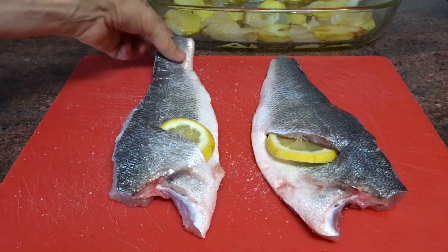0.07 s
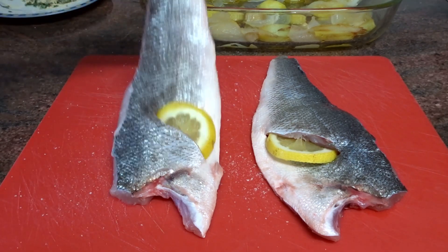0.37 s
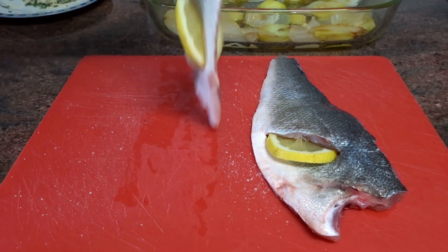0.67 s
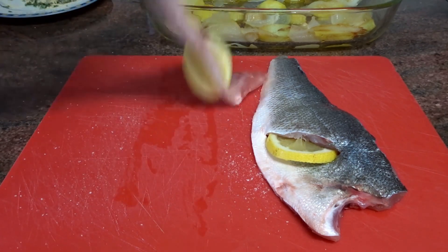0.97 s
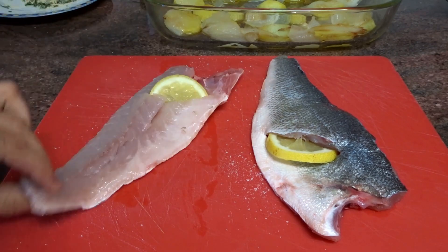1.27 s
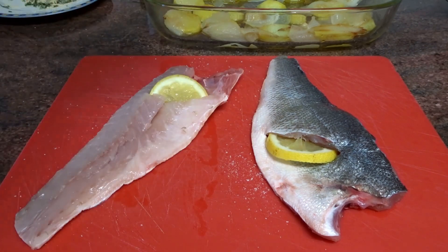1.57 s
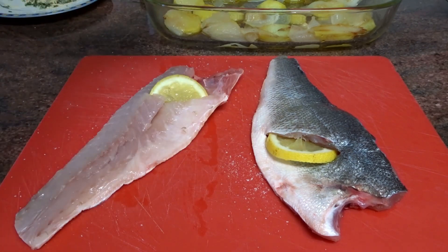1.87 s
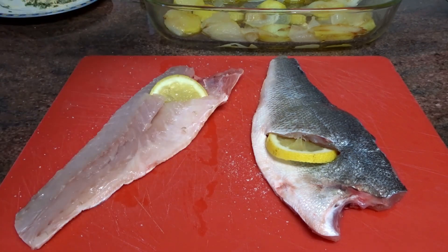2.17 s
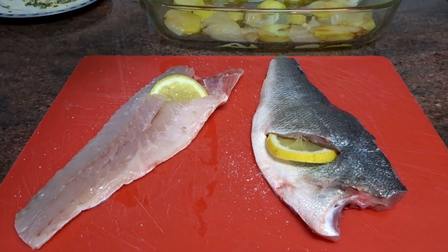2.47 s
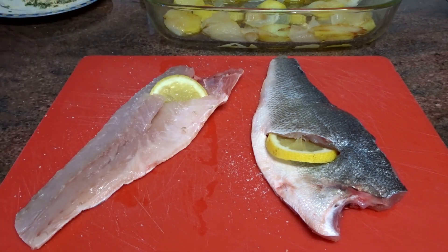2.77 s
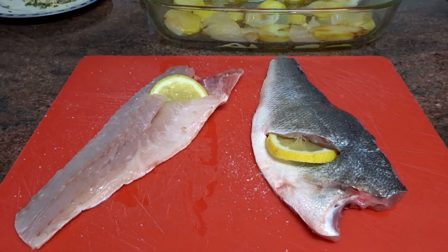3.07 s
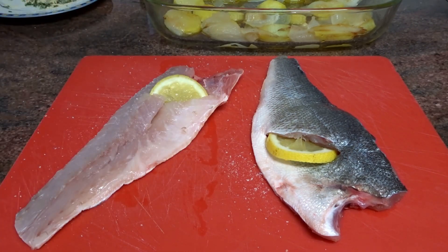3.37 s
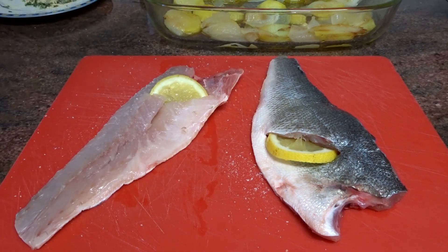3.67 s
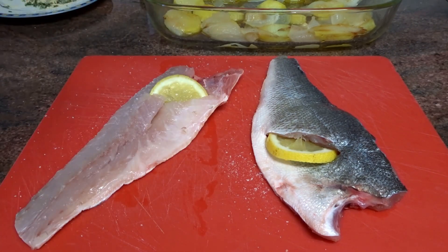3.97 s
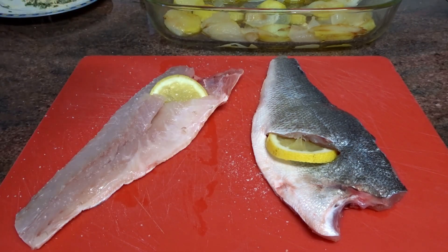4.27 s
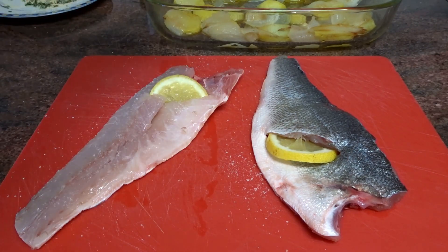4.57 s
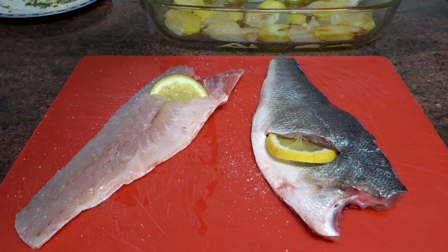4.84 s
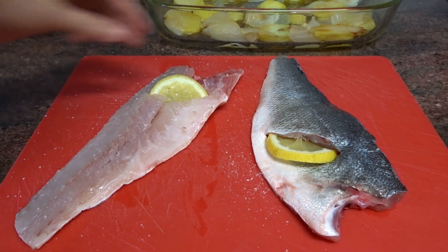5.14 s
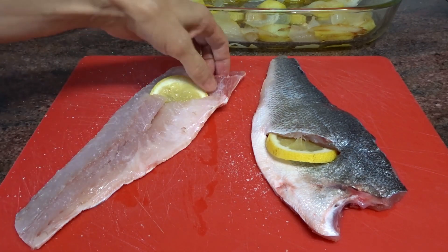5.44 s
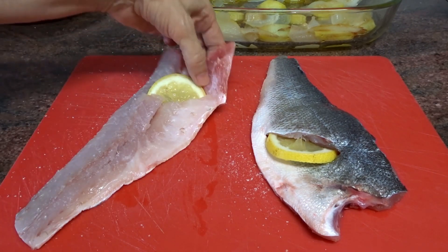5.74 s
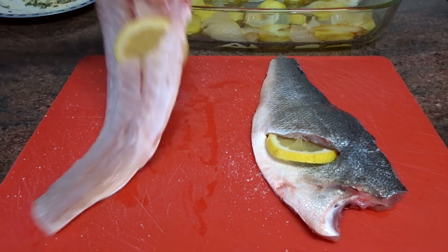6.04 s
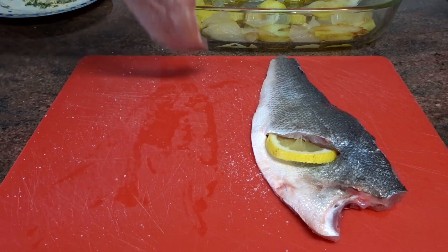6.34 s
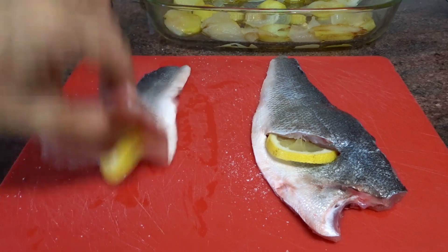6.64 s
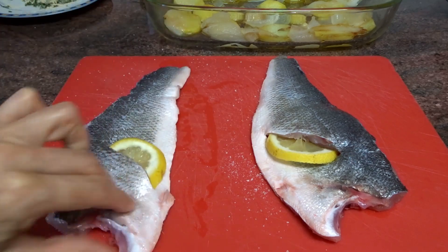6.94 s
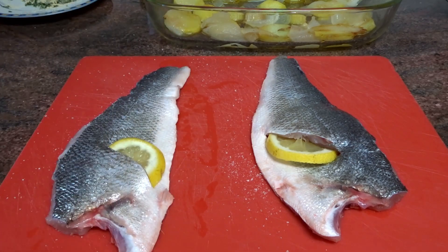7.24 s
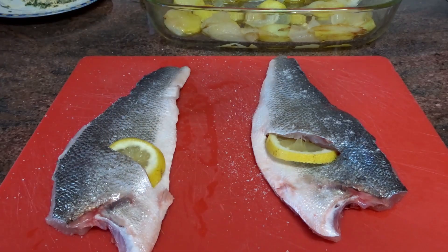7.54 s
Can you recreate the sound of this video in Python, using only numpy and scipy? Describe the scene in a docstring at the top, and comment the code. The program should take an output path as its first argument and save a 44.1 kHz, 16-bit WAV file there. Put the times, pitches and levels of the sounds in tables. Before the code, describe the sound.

Close by in a small kitchen, wet fish skin squelches off a cutting board and the fillet flops down. Salt rattles crisply in a shaker, pauses for about a second, then rattles again. A few damp finger taps and another sticky peel lead to the loudest sound, a wet slap back onto the board. A low hum and a faint rush like far traffic lie underneath.

```python
"""Raw fish fillets on a plastic cutting board in a small kitchen: one is peeled off, flipped and laid down,
salted from a shaker in two even bouts, then gripped, peeled off again and slapped back.
Peeling tears a wet film and rings pockets of air; landing excites the board's damped modes; salt rattles
as many tiny impacts. Behind it lie soft room noise, mains hum and a distant rush like traffic,
with one vehicle whose hum swells and sinks as it passes."""
import sys
import numpy as np
from scipy import signal
from scipy.fft import rfft, irfft, next_fast_len
from scipy.io import wavfile
from scipy.ndimage import map_coordinates

SR = 44100
rng = np.random.default_rng(int(sys.argv[2]) if len(sys.argv) > 2 else 0)


def waveform_to_disk(signal):
    """Save audio, clipped to [-1, 1], as 16-bit WAV at the path in sys.argv[1]."""
    frames = np.transpose(np.atleast_2d(signal))
    scaled = np.clip(frames, -1, 1) * 32767
    samples = np.round(scaled).astype(np.int16)
    wavfile.write(sys.argv[1], SR, samples)


N = 335468
TIME = np.arange(N) / SR


def amp(db):
    """Decibels as an amplitude ratio."""
    return 10 ** (np.asarray(db) / 20)


def unit(x):
    """Normalisation to rms 1."""
    return x / np.sqrt(np.mean(x ** 2) + 1e-20)


def along(points, hz):
    """Interpolation of (Hz, value) points on a logarithmic frequency axis."""
    freqs, values = np.transpose(points)
    return np.interp(np.log(hz + 1), np.log(freqs), values)


def wobble(rate):
    """Random modulation: a smooth curve with rate knots a second."""
    return map_coordinates(rng.standard_normal(int(N * rate / SR) + 4), [TIME * rate])


def filtered(x, response):
    """Linear filtering: the spectrum of x times a frequency response."""
    n = x.shape[-1]
    padded = next_fast_len(n + SR // 10)
    return irfft(rfft(x, padded) * response(np.fft.rfftfreq(padded, 1 / SR)), padded)[..., :n]


def resonance(hz, centre_hz, q):
    """Response of a damped oscillator, with a peak gain of 1."""
    damping = 1j * hz * centre_hz / q
    return damping / (centre_hz ** 2 - hz ** 2 + damping)


def stereo(pair, coherence):
    """Partial coherence: two independent signals mix as mid and side into left and right."""
    angle = lambda hz: np.arccos(np.clip(along(coherence, hz), -1, 1)) / 2
    mid, side = filtered(pair, lambda hz: np.array([np.cos(angle(hz)), np.sin(angle(hz))]))
    return np.array([mid + side, mid - side])


def add(track, s, sound):
    """Superposition of a sound on a stereo track from time s on."""
    start = round(s * SR)
    lo, hi = max(start, 0), min(start + sound.shape[-1], N)
    track[:, lo:hi] += sound[..., lo - start:hi - start]


def swell(t, rise_s, fall_s):
    """Growth and decay: an envelope that peaks at 1 at time 0."""
    return np.exp(-np.maximum(-t / rise_s, t / fall_s) ** 1.42)


def burst(noise, envelope):
    """Energy normalisation: shaped noise carries exactly the energy of its envelope."""
    return unit(noise * envelope) * np.sqrt(np.mean(envelope ** 2))


# Close sources. Each row: frequency in Hz, left-right coherence from 0 to 1.
NEAR_COHERENCE = [(800, 0.97), (2000, 1), (5000, 0.5), (12000, 0)]


def grains(t, rate, spread_db, spectrum, ring_hz=1000, ring=0, q=1, bounce=0.38):
    """Shot noise: tiny random impacts, coloured by a resonance and comb filtering; stereo, rms 1."""
    shape = (2, len(t))
    hits = rng.random(shape) < rate / SR
    impacts = hits * rng.standard_normal(shape) * amp(spread_db * rng.standard_normal(len(t)))
    delays_s = rng.uniform(0.000564, 0.007, size=(5, 1))  # reflections from hand, board and dish
    comb = lambda hz: 1 + bounce * np.exp(-2j * np.pi * delays_s * hz).sum(axis=0)
    colour = lambda hz: amp(along(spectrum, hz)) * (1 + ring * resonance(hz, ring_hz, q)) * comb(hz)
    return unit(stereo(filtered(impacts, colour), NEAR_COHERENCE))


# Spectra of tearing film, fine fizz and bright ticks. Each row: frequency in Hz, density in dB.
SQUELCH_SPECTRUM = [(150, -42.5), (550, -15.5), (820, 3), (1050, -3), (2000, 0), (3000, 1), (4200, -4.5),
                    (6500, -10.5), (16000, -68.5)]
FIZZ_SPECTRUM = [(100, -43.5), (1500, -41.5), (3500, -2.5), (5500, -4), (8500, -4), (12000, -7.5),
                 (16000, -12)]
TICK_SPECTRUM = [(100, -20), (2000, -4.5), (5000, -5), (9000, -4), (16000, -8)]


def wet_film(t, pocket_hz, ring, fizz_db):
    """Cavity resonance: the film tears in tiny snaps, coloured by the air pocket under the fillet."""
    squelch = grains(t, 3000, 2, SQUELCH_SPECTRUM, pocket_hz, ring=ring, q=15, bounce=0.25)
    cutoff_hz = 2.82 * pocket_hz  # a big pocket muffles the highs
    squelch = unit(filtered(squelch, lambda hz: 1 / (1 + (hz / cutoff_hz) ** 4)))
    fizz = grains(t, 5400, 5, FIZZ_SPECTRUM, bounce=0.33)
    bubbles = amp(-17) * grains(t, 290, 3.3, TICK_SPECTRUM)  # larger ones burst singly
    return squelch + amp(fizz_db) * (fizz + bubbles)


# Wet skin peeled, slid or pressed. Each row: peak time, rise and fall in seconds, squelch level in dB,
# fizz in dB relative to the squelch, air pocket frequency in Hz, gain of its resonance.
PEEL_EVENTS = [(.02, .18, 0.19, -60, -18, 1067, 5), (0.259, 0.12, 0.068, -71.5, 8.5, 3000, 1.5),
               (.5, 0.062, 0.03, -55.5, -10, 830, 5.7), (0.522, 0.019, 0.011, -49.5, -24, 1360, 8.4),
               (.533, 0.061, 0.024, -48, -43, 2290, 4), (.931, 0.0045, 0.0096, -39.5, -20, 1390, 9.1),
               (1.058, 0.052, 0.055, -44.5, -1.5, 2780, 1.1), (1.105, 0.035, 0.021, -44, -5, 2300, 0.81),
               (1.339, 0.0048, 0.012, -48.5, -13, 2170, 4.4), (1.358, 0.025, 0.012, -45, -21, 2180, 2.5),
               (1.385, 0.016, 0.028, -52.5, -31, 2330, 2.7), (2.712, 0.014, 0.013, -57, -14, 2200, 2),
               (3.138, 0.041, 0.033, -57.5, -38, 2330, 1.3), (5.414, 0.054, 0.017, -69, -34, 1390, 3),
               (5.44, 0.033, 0.02, -45.5, -48, 814, 6.5), (5.506, 0.015, .017, -48.5, -19.5, 1150, 7.4),
               (5.55, .004, .008, -49, -22, 1080, 3), (5.587, 0.022, 0.023, -50, -19, 2550, 2.4),
               (5.909, 0.04, 0.018, -60.5, -4.5, 910, 1.4), (6.175, 0.083, 0.074, -44.5, 1.5, 1750, 2.8),
               (6.222, 0.034, 0.019, -43, -3.5, 2480, 1.4), (6.812, 0.024, 0.022, -53, -10, 1620, 0.98),
               (6.912, 0.043, 0.036, -51.5, -11.5, 4480, 2.2), (7.19, 0.061, 0.069, -63, -37, 3710, 1.34)]


def peels():
    """Adhesive failure: the tearing of the film swells and lets go, ringing the air pockets that open."""
    out, t = np.zeros((2, N)), np.arange(-SR // 3, SR // 3) / SR
    for s, rise, fall, db, fizz_db, pocket_hz, ring in PEEL_EVENTS:
        add(out, s + t[0], amp(db) * swell(t, rise, fall) * wet_film(t, pocket_hz, ring, fizz_db))
    return out * amp(0.5 * wobble(110))  # the film lets go in uneven patches


# Distant and reverberant sound. Each row: frequency in Hz, left-right coherence from 0 to 1.
FAR_COHERENCE = [(400, .92), (950, 0.7), (2400, 0.027), (6000, 0)]
# Room noise. Each row: frequency in Hz, density in dB.
ROOM_SPECTRUM = [(40, -62), (140, -51.5), (205, -25.5), (250, -22), (300, -0.5), (420, -6), (620, -1.5),
                 (960, -1), (1250, -2.5), (1900, 1), (2850, -1), (3300, -3), (4200, -9), (7000, -15),
                 (9500, -20.5), (11000, -50.5), (16000, -47)]
# An appliance on the mains. Each row: frequency in Hz, initial level in dB, fade in dB per second.
MAINS_TONES = [(253, -78, 3.5), (300.4, -77, 1.5)]


def room_tone():
    """Noise floor: steady broadband noise with the slowly fading pure tones of a mains hum."""
    air = unit(filtered(rng.standard_normal((2, N)), lambda hz: amp(along(ROOM_SPECTRUM, hz))))
    air_db = -62.5 + 0.5 * wobble(4)
    mains = sum(amp(db - fade * TIME + wobble(7.4)) * unit(np.sin(2 * np.pi * hz * TIME))
                for hz, db, fade in MAINS_TONES)
    return stereo(amp(air_db) * air, FAR_COHERENCE) + mains


# The rush of far traffic. Each row: time in seconds, level in dB, centre frequency in Hz.
RUSH_COURSE = [(0.0, -58.5, 653), (0.81, -85.5, 597), (0.99, -72.5, 601.7), (2.29, -72, 480),
               (2.8, -64, 563.7), (3.03, -59.5, 669), (3.25, -66, 731.5), (3.66, -69, 497.8),
               (4.13, -63, 695.5), (4.67, -73.5, 651), (5.24, -77, 645), (5.42, -71, 687),
               (5.59, -59.5, 681), (5.87, -65, 603), (6.11, -69.5, 553), (6.37, -56.5, 667),
               (6.76, -66.5, 718), (7.1, -62, 712)]


def distant_rush(half_width_hz=181, low_cut_hz=300):
    """Narrowband noise: slow noise modulates a gliding carrier, and the band swells and ebbs."""
    times, levels, centres = np.transpose(RUSH_COURSE)
    db, centre_hz = np.interp(TIME, times, levels), np.interp(TIME, times, centres)
    slow = filtered(rng.standard_normal((2, 2, N)), lambda hz: 1 / (1 + (hz / half_width_hz) ** 4))
    phase = 2 * np.pi * np.cumsum(centre_hz) / SR
    band = slow[0] * np.cos(phase) + slow[1] * np.sin(phase)
    band = filtered(band, lambda hz: hz ** 4 / (hz ** 4 + low_cut_hz ** 4))
    return amp(db) * stereo(unit(band), FAR_COHERENCE)


# Sticky skin leaving the board. Each row: peak time in seconds, level in dB, resonance in Hz.
SKIN_SNAPS = [(.134, -60.5, 6450), (.212, -66, 11000), (.243, -49.5, 9500), (.3, -65, 13500),
              (.35, -64, 13500), (.412, -56, 8200), (.423, -61, 5660), (.485, -61, 8350),
              (1.31, -58.5, 9000)]


def snaps():
    """Sudden release: a small patch of skin lets go all at once in a crisp transient."""
    out, t = np.zeros((2, N)), np.arange(-SR // 20, SR // 20) / SR
    envelope = swell(t, rise_s=0.0035, fall_s=0.0073)
    for s, db, ring_hz in SKIN_SNAPS:
        crackle = grains(t, 5300, 2, FIZZ_SPECTRUM, ring_hz, ring=3, q=4.1)
        add(out, s + t[0], amp(db) * burst(crackle, envelope))
    return out


def blow(t, contact_s, t60):
    """Inelastic impact: the push builds as the flesh spreads, then damping grows as it settles."""
    return np.minimum(t / contact_s, 1) * amp(-60 * (np.maximum(t - contact_s, 0) / t60) ** 2.95)


# Modes of the board. Each row: base frequency in Hz, relative level in dB, base 60 dB decay in seconds.
BOARD_MODES = [(806.7, 1.5, 0.014), (1098, -10, 0.018), (1260, -17, 0.012), (1495, -22.5, 0.0078),
               (1750, -20.5, 0.012), (2230, -24.5, 0.017), (2660, -29, 0.011), (3190, -26, .012)]
# The struck water film. Each row: frequency in Hz, density in dB.
SPLAT_SPECTRUM = [(90, -29), (200, -31.5), (500, -22.5), (800, 6), (1100, 11.5), (1550, 3.5), (1950, 1.5),
                  (2400, 4), (3300, -1.5), (4100, -7), (5000, -6.5), (16000, -37)]


def strike(contact_s, thud_db, splat_db, tick_db, pocket_hz, length=1, tuning=1):
    """Impact excitation: the board's modes thud and the film splats around trapped air, with a tick."""
    t = np.arange(SR // 8) / SR
    loading = tuning + 0.075 * np.exp(-t / 0.0024)  # the settling weight lowers the pitch
    phase_per_hz = 2 * np.pi * np.cumsum(loading) / SR
    modes = np.zeros(len(t))
    for hz, db, t60 in BOARD_MODES:
        gain = amp(db + 0.7 * rng.standard_normal())
        modes += gain * blow(t, contact_s, length * t60) * np.sin(hz * phase_per_hz)
    radiation = signal.butter(2, 480, "highpass", fs=SR, output="sos")  # a small board gives little bass
    thud = signal.sosfilt(radiation, modes)
    film = grains(t, 22000, 0.33, SPLAT_SPECTRUM, pocket_hz, ring=1.1, q=3, bounce=0.2)
    splat = burst(film, blow(t, contact_s, length * 0.0089))
    tick = burst(grains(t, 15000, 3.3, TICK_SPECTRUM), blow(t, contact_s, length * 0.015))
    return amp(thud_db) * thud + amp(splat_db) * splat + amp(tick_db) * tick


# Flesh and fingers landing. Each row: start and contact time in seconds, decay time factor,
# board pitch factor, levels of thud, splat and flesh in dB, air pocket frequency in Hz.
LANDINGS = [(0.89, 0.00064, 0.62, 0.98, -36, -69, -52, 900), (0.918, 0.0032, 1.1, 1.1, -51, -48, -58, 1350),
            (0.9261, 0.0022, 1.15, 1, -50, -43.5, -46, 1450),
            (.9705, 0.0019, 0.85, 1.004, -35.5, -61, -56, 910), (.993, 0.002, 1.2, 1, -44, -52, -44, 1600),
            (1.001, 0.0048, 0.81, 0.87, -41, -42, -55, 1500),
            (1.021, 0.001, 0.64, 1.03, -30, -41, -53, 1000),
            (1.030, 0.0016, 0.61, 1, -37.5, -39, -48, 1400), (1.043, 0.001, 0.41, 1, -36, -56, -54, 2800),
            (1.049, 0.0012, 0.78, 1, -45, -58, -55, 2800),
            (1.073, 0.0035, 0.7, 0.986, -40.5, -45, -48, 2800),
            (5.380, 0.00046, 0.76, 1.09, -43.5, -42, -48, 1203),
            (5.3869, 0.00061, 0.43, 0.96, -34.5, -39, -42.5, 1370),
            (5.424, 0.007, 0.8, 1.25, -42, -45, -45, 1150),
            (5.435, 0.0062, 1.15, 1.02, -35.5, -49, -57, 1400),
            (5.449, 0.0013, 0.87, 1, -47, -44, -44, 1500),
            (5.6621, 0.00032, 0.39, 0.9, -46, -36.5, -48, 1360),
            (5.6627, 0.00048, 0.77, 1.05, -31.5, -37, -44.5, 1180),
            (5.685, 0.0028, 0.89, 1.1, -39, -44.5, -44.5, 1130),
            (6.531, 0.002, 0.74, 0.9, -37.5, -56, -60, 800),
            (6.560, 0.0036, 2, 1.03, -49.5, -61.5, -58.5, 800),
            (6.653, 0.0027, .8, 0.97, -33, -31, -48.5, 2530),
            (6.661, 0.0024, 0.98, 1, -34, -39.5, -48.5, 1000),
            (6.6715, 0.0014, 0.55, 0.87, -34, -29.5, -54.5, 3300),
            (6.6738, 0.0011, 0.9, 0.99, -21, -23.5, -49.5, 1597),
            (6.684, 0.0023, 0.5, 1, -41, -35, -53.5, 2764),
            (6.714, .004, 1.7, 0.87, -45, -54.5, -48.5, 1190),
            (6.727, 0.0019, 1.5, 0.96, -54, -43, -51, 986.5)]
# Wobbling flesh. Each row: frequency in Hz, density in dB.
FLESH_SPECTRUM = [(60, -44), (180, -27), (310, -8), (430, -6), (600, 0.5), (900, 4.5), (1500, 1.5),
                  (1900, -29.5), (4000, -36.5), (16000, -73)]


def slaps():
    """Soft-body impact: flesh lands, wobbles and squeezes out the film beneath it."""
    out, t = np.zeros((2, N)), np.arange(SR // 4) / SR
    squeeze = swell(t - 0.006, rise_s=0.0089, fall_s=0.032)
    for s, contact_s, length, tuning, thud_db, splat_db, flesh_db, pocket_hz in LANDINGS:
        tick_db, squeeze_db = splat_db - 24, splat_db - 15  # droplets and squelch grow with the splat
        add(out, s, strike(contact_s, thud_db, splat_db, tick_db, pocket_hz, length, tuning))
        flesh = grains(t, 22000, 0.94, FLESH_SPECTRUM, bounce=0.201)
        add(out, s, amp(flesh_db) * blow(t, contact_s, t60=0.041) * flesh)
        add(out, s, amp(squeeze_db) * squeeze * wet_film(t, pocket_hz=1340, ring=1.5, fizz_db=-13.5))
    return out


# Modes of the worktop and dishes. Each row: frequency in Hz, bandwidth in Hz, peak gain in dB.
WORKTOP_MODES = [(802, 49, -4), (882, 30, -10.5), (1057, 34.7, -9), (1136, 13, -15), (1280, 22, -10),
                 (1540, 16, -2.5), (1682, 18, -1), (2540, 28, -7)]


def worktop(knocks):
    """Sympathetic resonance: knocks pass through the board and leave worktop and dishes ringing."""
    return filtered(knocks, lambda hz: sum(amp(db) * resonance(hz, centre, q=centre / width)
                                           for centre, width, db in WORKTOP_MODES))


# Faint, very short, bright ticks. Each row: start in seconds, tick level in dB.
FAINT_TICKS = [(.946, -49), (0.971, -42.5), (2.173, -44.5), (2.659, -52.5), (2.724, -69), (3.7044, -48),
               (4.78, -43), (4.913, -50.5), (5.543, -54), (6.532, -51), (6.594, -52), (6.6702, -37),
               (6.814, -55.5)]


def clicks():
    """Broadband transients: very short, bright ticks with only a trace of thud and splat."""
    out = np.zeros((2, N))
    for s, db in FAINT_TICKS:
        add(out, s, strike(contact_s=0.00047, thud_db=db - 15, splat_db=db - 12.5, tick_db=db,
                           pocket_hz=2500, length=0.56))
    return out


# Rattling salt. Each row: frequency in Hz, density in dB.
SALT_SPECTRUM = [(50, -47), (110, -17.5), (900, -49.5), (2100, -7), (2850, 4.5), (3700, 0.5), (5500, 2.5),
                 (8000, 0.5), (9500, 0.5), (11500, 2.5), (16000, -2.5)]


def throw(t, width_s, ring_hz, patter_lag_s=0.039, patter_width_s=0.082):
    """Granular impact: crystals ring the shaker's wall, and stray ones patter down after."""
    wall_hz = ring_hz * (1 + 0.048 * rng.standard_normal())
    crystals = grains(t, 9000, 1.5, SALT_SPECTRUM, wall_hz, ring=1.9, q=3.65, bounce=0.24)
    rattle = np.exp(-np.abs(t / width_s) ** 1.54 / 2) * crystals
    patter = np.exp(-((t - patter_lag_s) / patter_width_s) ** 2) * grains(t, 900, 4.3, FIZZ_SPECTRUM)
    return rattle + amp(-15) * patter


# Strokes of the shaker, in two bouts. Each row: peak time in seconds, level in dB,
# half length in seconds, mean wall resonance in Hz, left over right in dB.
SHAKER_STROKES = [(1.564, -64.5, 0.015, 7000, 2), (1.666, -56.5, 0.016, 7000, 1.5),
                  (1.82, -45.5, 0.018, 6900, 0.5), (1.954, -43.5, 0.019, 7600, 0.5),
                  (2.103, -42.5, .027, 7000, 2), (2.249, -43.5, 0.026, 7440, 1),
                  (2.39, -43.5, .028, 7540, 0.5), (2.53, -48.5, 0.02, 7500, 1.5),
                  (2.627, -64.5, 0.039, 7340, -2), (3.731, -49.5, .02, 5300, 3.5),
                  (3.86, -48, 0.024, 5200, 1.5), (4.012, -44.5, 0.027, 5040, 2.5),
                  (4.139, -42, 0.019, 5196, 1.5), (4.273, -42.5, 0.02, 5470, 2),
                  (4.42, -41.5, 0.02, 5400, 1), (4.554, -41, .02, 5650, 0.5),
                  (4.695, -41.5, 0.02, 5800, .5), (4.827, -43.5, 0.025, 5800, 0.5),
                  (4.928, -50, .02, 5950, 0)]
# Salt sliding in the tilted shaker. Each row: peak time and half length in seconds, level in dB.
SHAKER_TILTS = [(3.226, 0.049, -59.5), (5.05, 0.028, -61)]


def salt():
    """Granular flow: every stroke and tilt of the shaker throws the crystals in clumps."""
    out, t = np.zeros((2, N)), np.arange(-SR // 3, SR // 3) / SR
    for s, db, width_s, ring_hz, pan_db in SHAKER_STROKES:
        gains = amp([[db + pan_db / 2], [db - pan_db / 2]])
        add(out, s + t[0], gains * throw(t, width_s, ring_hz))
    for s, width_s, db in SHAKER_TILTS:
        add(out, s + t[0], amp(db) * throw(t, width_s, ring_hz=5230))
    return out * amp(1.23 * wobble(130))


def passing_vehicle(nearest_s=2.47, near_s=0.22, sag_hz_per_s=13):
    """Inverse-distance law: a hum swells and fades, sinking in pitch, over the rumble of tyres."""
    since = TIME - nearest_s
    loss_db = 4 * np.abs(since) + 7 * np.maximum(since, 0)  # extra loss, steeper once it has gone by
    nearness = amp(-loss_db) / np.hypot(1, since / near_s)
    hum_hz = 418.4 - sag_hz_per_s * since + 3 * wobble(30)
    tone = unit(np.sin(2 * np.pi * np.cumsum(hum_hz) / SR))
    hum = tone * nearness * amp(-59.5 + 0.8 * wobble(24))
    tyre_band = lambda hz: np.exp(-(np.log2((hz + 1) / 364) / 0.66) ** 2)
    tyres = stereo(unit(filtered(rng.standard_normal((2, N)), tyre_band)), FAR_COHERENCE)
    return hum + amp(-69) * tyres * swell(TIME - 2.38, rise_s=2.67, fall_s=0.99)


# The kitchen's decay. Each row: frequency in Hz, reverberation time (60 dB) in seconds.
REVERB_TIMES = [(200, 0.16), (800, 0.56), (2500, 0.55), (6000, 0.6), (14000, 0.29)]


def kitchen(x, early_db, early_s):
    """Reverberation: counter and cupboards answer at once, far walls linger; bass and top die first."""
    hz, t, noise = signal.stft(rng.standard_normal((2, SR // 2)), SR, nperseg=256)
    decay = amp(-60 * t / along(REVERB_TIMES, hz)[:, None])
    early = 1 + amp(early_db) * np.exp(-t / early_s)
    tail = stereo(signal.istft(noise * decay * early, SR, nperseg=256)[1], FAR_COHERENCE)
    tail = np.pad(tail / np.linalg.norm(tail[0]), ((0, 0), (SR // 140, 0)))  # 7 ms after the direct sound
    return signal.fftconvolve(x, tail, axes=1)[:, :N]


def scene():
    """Superposition: fish and salt close by and a little to the left, their echoes, the background."""
    knocks, wet, shaker = slaps() + clicks(), peels() + snaps(), salt()
    room = amp(-7) * kitchen(knocks, early_db=0, early_s=0.035)
    room += kitchen(amp(-6) * wet + amp(-9) * shaker, early_db=3.5, early_s=0.0063)
    direct = knocks + worktop(knocks) + wet + shaker
    lead_s = np.array([[0.00001], [-0.00001]])  # the sound reaches the left side first
    near = filtered(direct, lambda hz: np.exp(2j * np.pi * lead_s * hz))
    return near + room + room_tone() + passing_vehicle() + distant_rush()


def record(dry):
    """Gating and band limiting: the sound stops shortly before the end and loses its highest treble."""
    stop_s, fade_s, top_hz = 7.288, 0.008, 15800
    gate = np.clip((stop_s - TIME) / fade_s, 0, 1)
    return filtered(dry * gate, lambda hz: np.clip((top_hz - hz) / 100 + 0.5, 0, 1))


dry = scene()
out = record(dry)
waveform_to_disk(out)
```